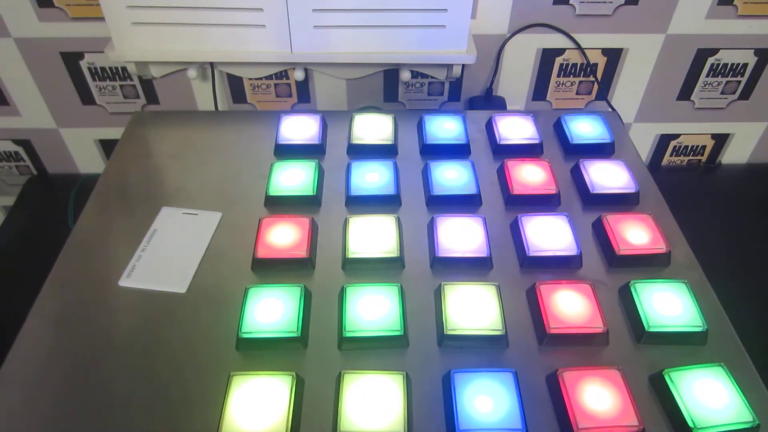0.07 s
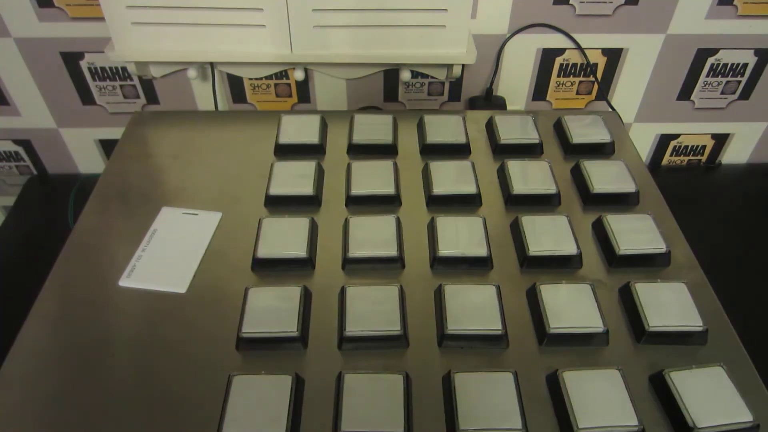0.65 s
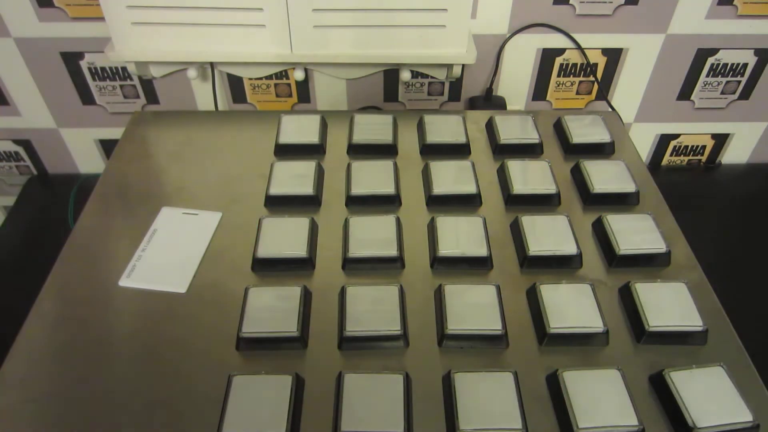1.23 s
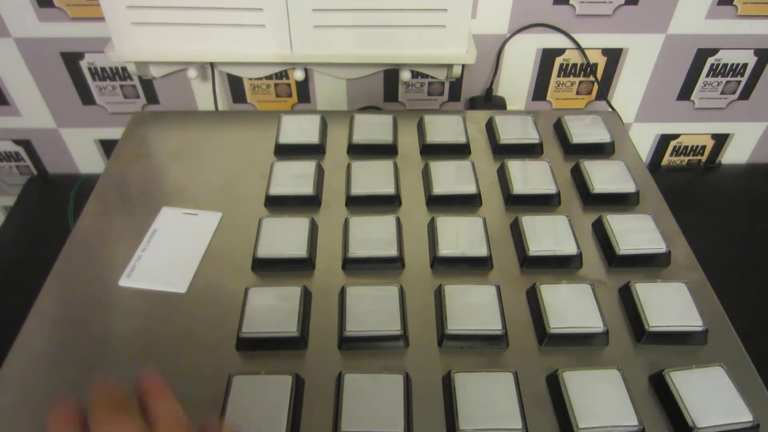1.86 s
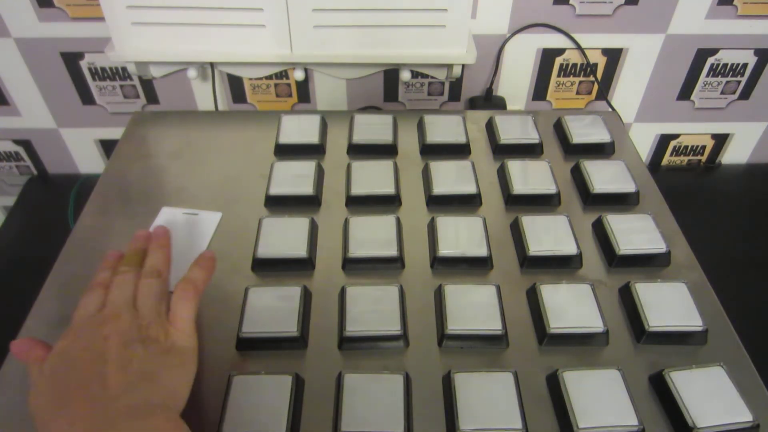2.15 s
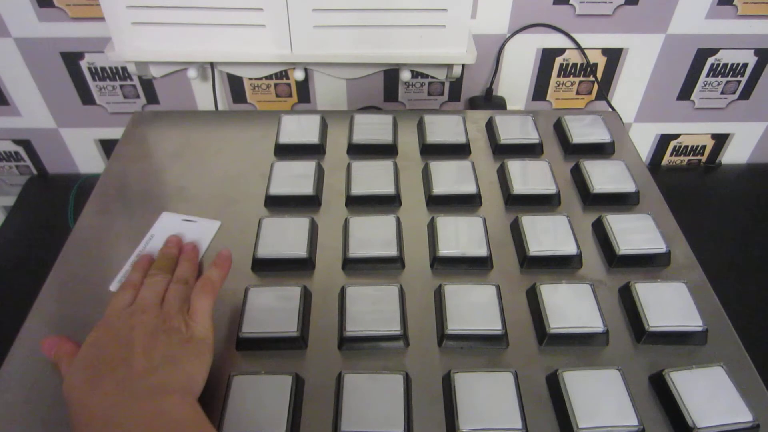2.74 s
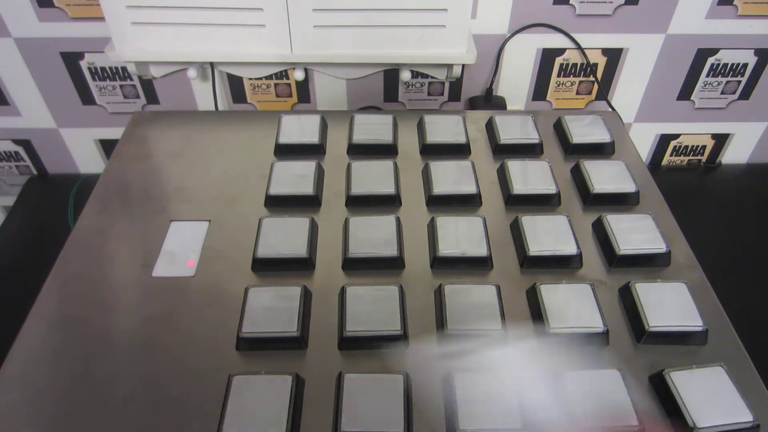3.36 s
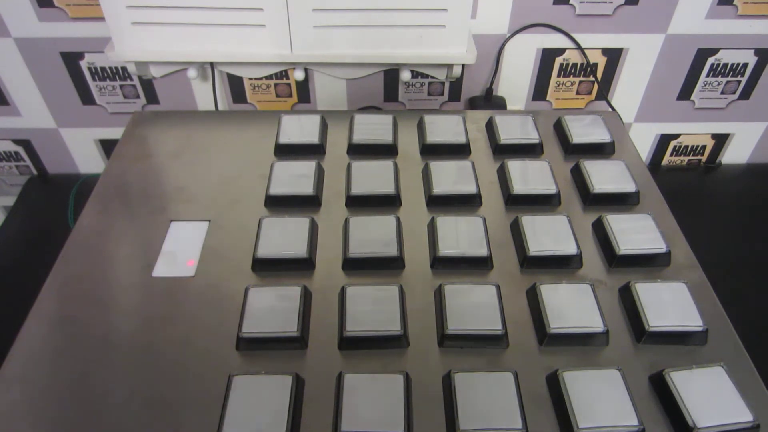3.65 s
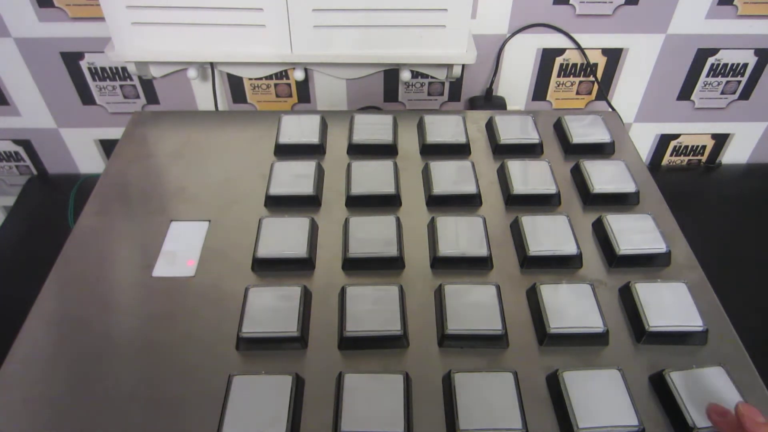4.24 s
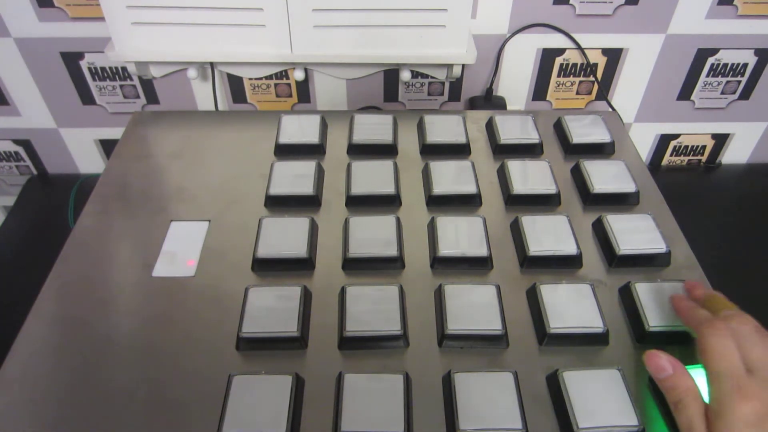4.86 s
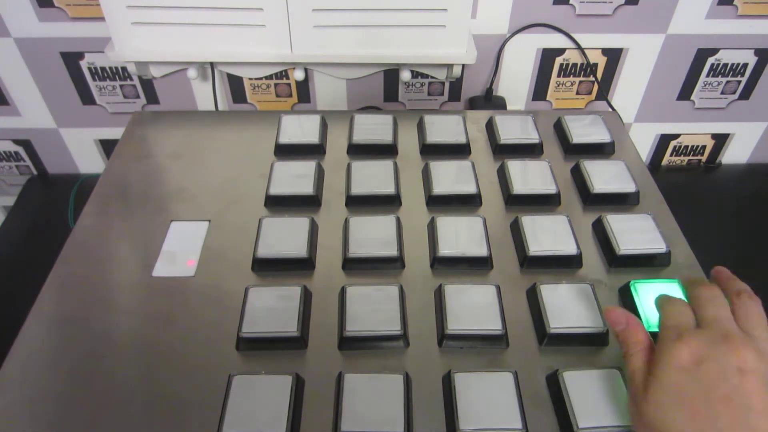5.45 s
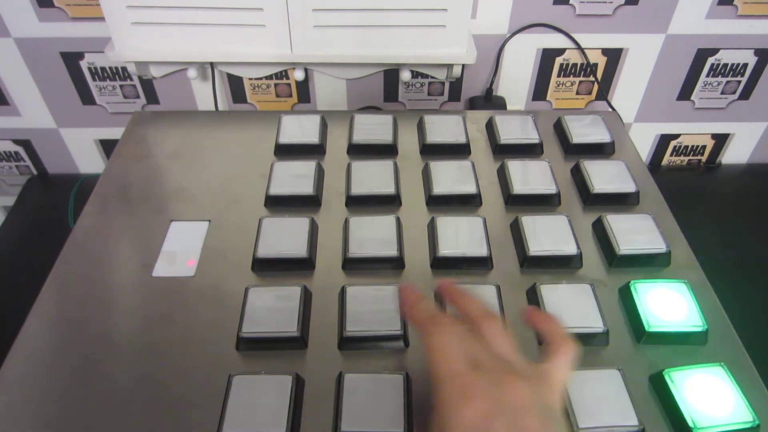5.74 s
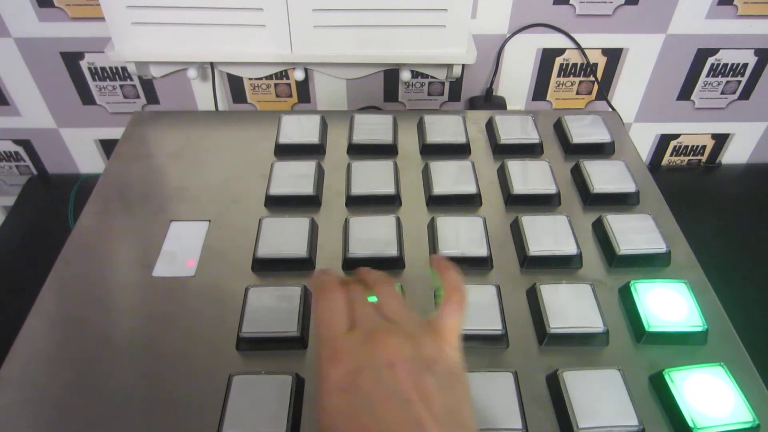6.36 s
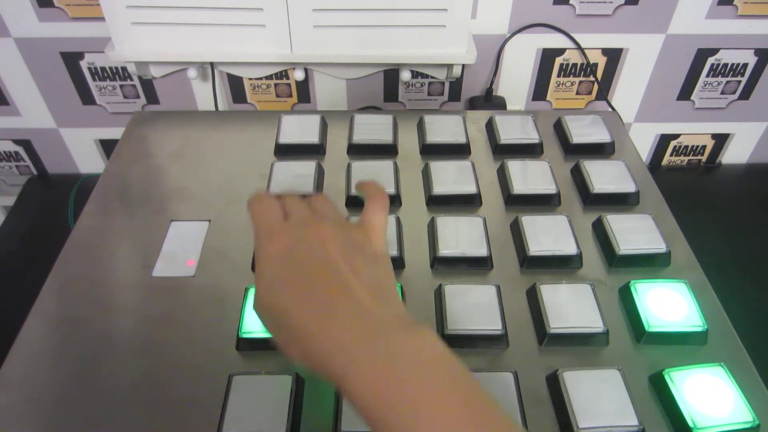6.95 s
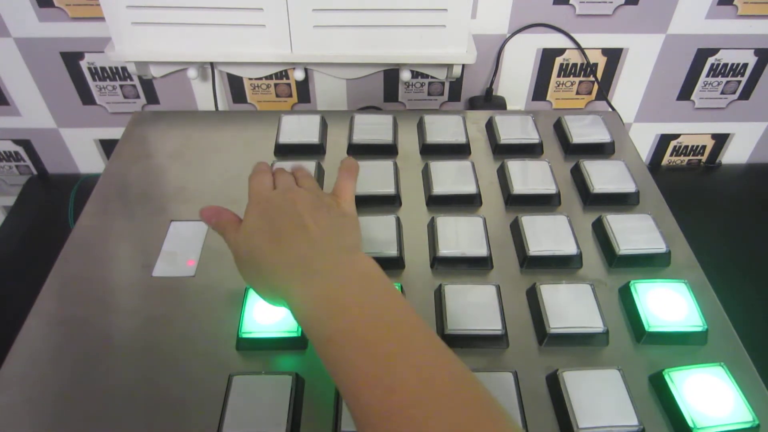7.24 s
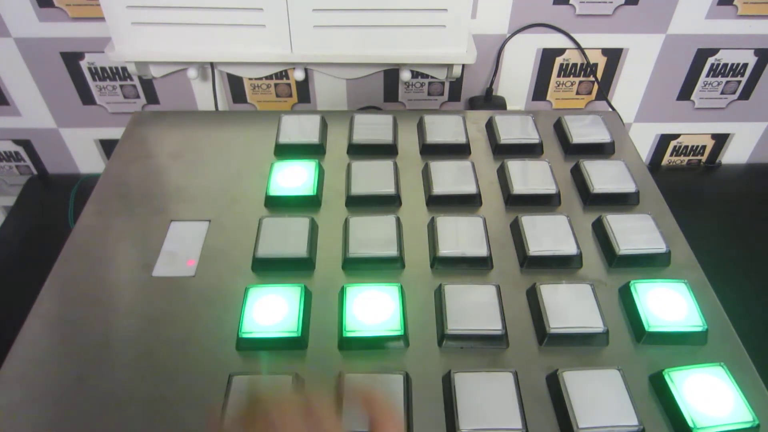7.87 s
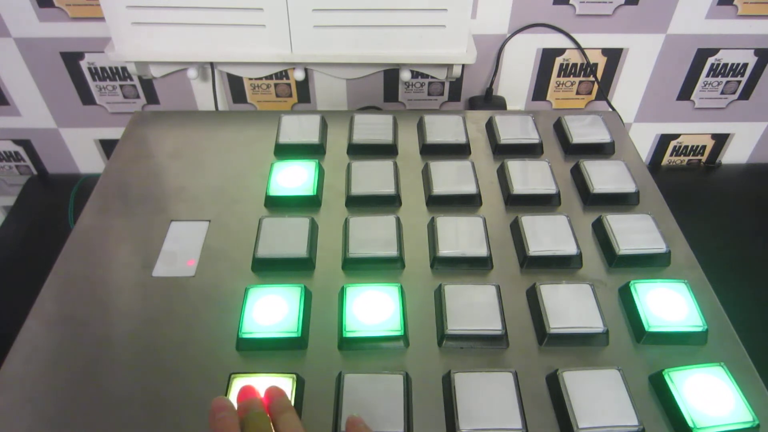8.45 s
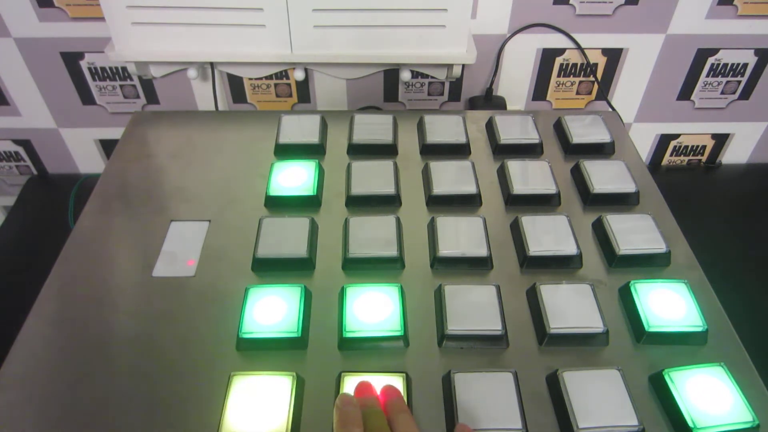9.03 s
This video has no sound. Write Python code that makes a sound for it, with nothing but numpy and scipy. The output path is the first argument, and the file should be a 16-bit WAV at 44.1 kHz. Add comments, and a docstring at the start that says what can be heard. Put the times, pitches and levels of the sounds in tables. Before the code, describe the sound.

Big buttons clack down and snap back one after another in a small room, after a card slides off the console.

```python
"""In a small hard room, over hum and fan noise, a metal console ticks faintly and a hand slides a plastic card
off it: friction, a dense train of tiny slips. After a lone bright click, the hand presses seven large buttons
in turn. Each cap clacks under the finger and chatters as it bottoms out; a spring snaps six of them back before
the sound ends. Each impact excites damped modes of the hollow panel, and the room reverberates."""
import sys
import numpy as np
from scipy import signal
from scipy.fft import rfft, irfft
from scipy.io import wavfile

SR = 44100
rng = np.random.default_rng(int(sys.argv[2]) if len(sys.argv) > 2 else 0)


def master(y):
    """Save y as 16-bit WAV."""
    cut = np.clip(np.atleast_2d(y).T, -1, 1)
    pcm = np.round(cut * 32767)  # scale
    wavfile.write(sys.argv[1], SR, pcm.astype(np.int16))


N = 401310

# Caps bottoming out. Each row: start in seconds, force in dB, brightness in dB, chatter in seconds,
# knock frequency in Hz.
PRESSES = [(4.444, -24.5, 0.5, 0.0091, 1360), (5.166, -25.5, 0, 0.014, 1190),
           (6.087, -21.5, -1, 0.0093, 860), (6.678, -26.5, 1, 0.0098, 1510),
           (7.317, -21, -4.5, 0.0082, 1130), (8.388, -22.5, 1, 0.0058, 950),
           (8.953, -22.5, 1, 0.0083, 1080)]
# Spectral envelope of a press or release. Each row: frequency in Hz, gain in dB.
SNAP_SPECTRUM = [(35, -23), (60, -11.5), (91, -21), (142, -10), (427, -18.5), (469, -10.5), (749, -3.5),
                 (1550, 0.5), (2090, -2.5), (2770, -2.5), (3500, -10.5), (9570, -16.5), (12100, -25),
                 (13900, -26.5), (16000, -39)]
# Prominence of a cap's modes in a press or release. Each row: frequency in Hz, gain in dB, width in Hz.
SNAP_PEAKS = [(158, 1.5, 17), (487, 2.7, 59), (1030, 4.5, 160), (1600, 1, 33), (2760, 1.4, 40),
              (4770, 10, 250), (6900, 3.5, 380), (10000, 4.1, 350), (14200, 2.1, 120)]


def gain_of(db):
    """Amplitude ratio of a level in decibels."""
    return 10 ** (np.asarray(db) / 20)


def unit_rms(x):
    """Normalisation to an rms of 1."""
    return x / np.sqrt(np.mean(x ** 2) + 1e-20)


def curve_at(points, hz):
    """Interpolation on a logarithmic frequency axis."""
    f, value = np.transpose(points)
    return np.interp(np.log(hz + 1), np.log(f + 1), value)


def add(mix, start, sound):
    """Superposition of a stereo sound on the mix, from a start in seconds."""
    part = mix[:, round(start * SR):][:, :sound.shape[1]]
    part += sound[:, :part.shape[1]]


def minimum_phase(gain):
    """Causality: a response of this shape, with peak gain 1, that never precedes its excitation."""
    log_gain = np.log(np.maximum(gain / gain.max(), 1e-5))
    mirrored = np.r_[log_gain, log_gain[-2:0:-1]]
    return np.exp(np.conj(signal.hilbert(mirrored)))[:len(gain)]


def band(hz, low, high):
    """Magnitude response of a fourth-order band-pass."""
    return 1 / np.sqrt((1 + (low / (hz + 1)) ** 8) * (1 + (hz / high) ** 8))


def resonance(hz, centre, width):
    """Response of one damped mode, with gain 1 at its centre."""
    return 1 / (1 + 2j * (hz - centre) / width)


def correlate(noise, coherence):
    """Partial coherence: the right channel shares some of the left one's noise."""
    left, right = noise
    return np.array([left, coherence * left + np.sqrt(1 - coherence ** 2) * right])


def wander(rate_hz):
    """Random modulation: low-passed noise of rms 1."""
    hz = np.fft.rfftfreq(N, 1 / SR)
    return unit_rms(irfft(rfft(rng.standard_normal(N)) * np.exp(-(hz / rate_hz) ** 2), N))


def microphone_paths(hz):
    """Transfer functions from the panel to the two microphone ports, unequal in level and phase."""
    # Each row: frequency in Hz, level of left over right in dB.
    balance = [(60, -6), (120, -2.5), (240, -3), (480, -2.5), (950, -3), (1890, -1), (3770, 1),
               (7520, -3.5), (15000, -11)]
    # Each row: frequency in Hz, phase lead of the left in radians.
    lead = [(0, -0.5), (1460, 0.6), (2330, -0.46), (5000, 1.37), (5600, 0.58), (14400, 2), (16200, -8)]
    left = gain_of(curve_at(balance, hz) / 2) * np.exp(.5j * curve_at(lead, hz))
    return np.array([left, 1 / left])


def fan():
    """Broadband air noise under a few hum tones that waver by phase modulation."""
    # Air noise. Each row: frequency in Hz, relative level in dB.
    air_spectrum = [(15, -45), (25, -13), (48, -4), (102, -2.5), (134, -13), (263, -9), (363, -12),
                    (591, -11.5), (734, -14), (818, -13.5), (1480, -12.5), (3250, -28.5), (7710, -36.5),
                    (11900, -50), (16000, -47)]
    # Each row: frequency in Hz, left-right coherence.
    coherence = [(60, 0.066), (180, 0.04), (550, 0.022), (1650, 0.0087), (5000, 0.011), (15000, .05)]
    # Each row: frequency in Hz, relative level in dB.
    hum_tones = [(102.3, -65.5), (263.8, -70.5), (592.2, -77), (1480, -84)]
    t, hz = np.arange(N) / SR, np.fft.rfftfreq(N, 1 / SR)
    noise = correlate(rfft(rng.standard_normal((2, N))), curve_at(coherence, hz))
    air = unit_rms(irfft(noise * gain_of(curve_at(air_spectrum, hz)), N))
    swell = gain_of(.3 * wander(3))
    hum = sum(gain_of(db) * np.sqrt(2) * np.sin(2 * np.pi * f * t + 1.3 * wander(1.9))
              for f, db in hum_tones)
    return (gain_of(-50.52) * air * swell + gain_of(-3) * hum) * gain_of([[-.6], [.6]])


def crowded_modes(hz):
    """Modal overlap: a cap's upper modes merge into peaks and valleys, new for every spot struck."""
    centres = np.arange(0, SR / 2, 140)
    ripple = np.interp(hz, centres, rng.standard_normal(len(centres)))
    return gain_of(2.3 * unit_rms(ripple) * hz ** 2 / (hz ** 2 + 1000 ** 2))


def impact(start, force_db, bright_db, chatter_s, modes_hz,
           weight_db=0, hollow_db=0, pan_db=0, top_db=0, sway_db=0, *, balance_db):
    """Spectral balance of one impact: thud, clack and click are set relative to the knock."""
    thud_db, clack_db, click_db = balance_db
    levels_db = force_db + np.array([thud_db + weight_db, 0, clack_db + bright_db, click_db + bright_db])
    return start, levels_db, chatter_s, hollow_db, pan_db, top_db, sway_db, modes_hz


def struck_console(impacts, spectrum, peaks, sparkle_db, cavity_db, room_db,
                   t60_scale, crack, thump, thump_hz, thud_rise_scale, coupling=1):
    """Impact excitation: a hard contact and a rattle of small ones ring cap, panel and room."""
    # Modes of the panel and its caps. Each row: frequency in Hz, width in Hz, relative gain in dB.
    panel_modes = [(60.5, 4.8, 11), (142.3, 14.6, 2.5), (194.7, 23, 3), (291, 9.2, 9.5), (370.7, 3.1, 6),
                   (229.3, 34, -8), (470.5, 4.3, 2), (619.6, 7.8, 4), (689, 4.1, 5.5), (861, 9.7, 0.5),
                   (1073, 9.6, 2.5), (1520, 5.9, -13), (1806, 12, -20), (2567, 9.2, 4), (2720, 68, -7.5),
                   (2810, 73, -10), (4890, 25, -0.5), (5560, 69, -11), (6670, 380, -6.5)]
    # Thud, knock, clack and click. Each row: lower and upper band edge in Hz.
    registers = [(70, 400), (400, 2000), (2000, 4500), (4500, 16000)]
    # Each row, one per register: trim in dB, base rise and base T60 in seconds, base room level in dB,
    # room T60 in seconds, left-right coherence of the room.
    decays = [(0.3, 0.019, 0.14, -10, 0.38, 0.73), (0.3, 0.00063, 0.1, -6.5, .32, 0.71),
              (0.3, 0.00065, 0.062, -2.5, 0.27, 0.47), (0.3, 0.0015, 0.023, -4, 0.23, 0.27)]
    size = 24576
    t, hz = np.arange(size) / SR, np.fft.rfftfreq(size, 1 / SR)
    panel = 1 + coupling * sum(gain_of(db) * resonance(hz, f, width) for f, width, db in panel_modes)
    colour, paths = gain_of(curve_at(spectrum, hz)), microphone_paths(hz)
    filters = [minimum_phase(colour * band(hz, *edges)) * panel * paths for edges in registers]
    top_octave = hz ** 6 / (hz ** 6 + 8500. ** 6)
    cavity = np.exp(-(2 * np.log2((hz + 1) / 580)) ** 4)  # the box under the caps
    rocking = 1 / (1 + (hz / 90) ** 6)  # the console sways more under some buttons
    first_contact = np.arange(size) == round(SR * .001)
    flexure = thump * np.sin(2 * np.pi * thump_hz * t)  # the whole panel bends
    peak_db, peak_width = np.array(peaks)[:, :2], np.array(peaks)[:, ::2]
    out = np.zeros((2, N))
    for start, levels_db, chatter_s, hollow_db, pan_db, top_db, sway_db, modes_hz in impacts:
        free_time = np.maximum(t - chatter_s, 0)  # decay begins when the chatter ends
        modes = sum(gain_of(curve_at(peak_db, f)) * resonance(hz, f, curve_at(peak_width, f))
                    for f in modes_hz)
        spot_db = (sparkle_db + top_db) * top_octave + (cavity_db + hollow_db) * cavity
        spot_db += sway_db * rocking
        cap = (1 + modes) * minimum_phase(crowded_modes(hz) * gain_of(spot_db))
        rattle = unit_rms(rng.standard_normal(size) * (rng.random(size) < .15))
        echoes = rng.standard_normal((2, size))
        sides_db = np.array([[.5], [-.5]]) * pan_db
        for k, register_db in enumerate(levels_db):
            trim_db, rise, t60, wet_db, room_t60, coherence = decays[k]
            if k == 0:
                drive = rattle + flexure
                rise *= thud_rise_scale
            else:  # the hard first contact is mostly treble
                drive = rattle + first_contact * crack * k / 2
            direct = drive * (1 - np.exp(-t / rise)) * gain_of(-60 * free_time / (t60 * t60_scale))
            room = correlate(echoes, coherence) * (1 - np.exp(-t / (rise + 0.0011)))
            room *= gain_of(wet_db + room_db - 60 * t / room_t60)
            sound = irfft(rfft(direct + room) * filters[k] * cap)
            sound /= np.sqrt(np.mean(sound[:, t < .03] ** 2))  # the attack sets the level
            add(out, start - .0005, sound * gain_of(trim_db + register_db + sides_db))
    return out


def ticks():
    """Light impacts, weakly coupled to the panel, sound bright and have little body."""
    # Each row: start in seconds, force in dB, brightness in dB, mode frequency in Hz.
    events = [(0.982, -58, -4.5, 3340), (1.008, -61.5, -4, 2330), (1.145, -58.5, -7, 2500),
              (1.197, -57, -2.5, 2790), (1.375, -68, 22, 3770), (3.777, -36.5, 2.5, 4170)]
    # Spectral envelope. Each row: frequency in Hz, gain in dB.
    spectrum = [(100, 0), (900, -6.5), (2000, -6.5), (3000, -3), (5500, -13), (9000, -22.5), (12000, -33),
                (16000, -43)]
    # Modal prominence. Each row: frequency in Hz, gain in dB, width in Hz.
    peaks = [(1200, -23, 200), (3800, 10, 1600)]
    impacts = [impact(start, force_db, bright_db, 0.003, [mode_hz], balance_db=(-13, 2.4, -0.5))
               for start, force_db, bright_db, mode_hz in events]
    return struck_console(impacts, spectrum, peaks, sparkle_db=3, cavity_db=0, room_db=-0.5,
                          t60_scale=0.83, crack=9.8, thump=.02, thump_hz=159, thud_rise_scale=0.75,
                          coupling=.2)


def stroke(t, length, rise_share, easing_db_per_s, hold_s=0.13, t60=0.25):
    """Friction envelope: it grows with speed, eases as the hand lightens and decays once it stops."""
    rise = np.clip(t / (rise_share * length), 0, 1)
    easing_db = easing_db_per_s * np.maximum(t - hold_s, 0)
    decay_db = 60 * np.maximum(t - length, 0) / t60
    return rise * gain_of(-easing_db - decay_db)


def card_friction():
    """Sliding friction: tiny slips come in clumps as the card is brushed, dragged and lifted off."""
    # Each row: start in seconds, length in seconds, level in dB, brightness in dB.
    strokes = [(2.316, 0.057, -45, -6), (2.756, 0.48, -39, 4.5), (3.32, .09, -72, 10)]
    # Rumble, rub and hiss. Each row: relative level in dB, rising share of a stroke, easing in dB/s.
    envelopes = [(-4.5, .1, 41), (-0.5, 0.1, 70), (-3.5, 0.31, 32)]
    # Plastic on metal. Each row: frequency in Hz, gain in dB.
    spectrum = [(29, -27), (50, 11), (81, -12), (138, -3), (291, -12.5), (329, -16), (461, -14), (746, -10),
                (1180, -7), (1270, -6.5), (2490, -8.5), (3330, -17), (6090, -14), (12000, -13.5),
                (16000, -15)]
    # The same three layers. Each row: band edges in Hz, graininess in dB, left-right coherence.
    layers = [(70, 890, 0.86, 0.48), (680, 5300, 0.9, 0.61), (3670, 8700, 1.0, 0.56)]
    t, hz = np.arange(N) / SR, np.fft.rfftfreq(N, 1 / SR)
    surface = gain_of(curve_at(spectrum, hz)) * microphone_paths(hz)
    out = np.zeros((2, N))
    for k, (low, high, grain_db, coherence) in enumerate(layers):
        layer_db, rise_share, easing = envelopes[k]
        slips = correlate(rng.standard_normal((2, N)), coherence) * gain_of(grain_db * wander(400))
        rub = unit_rms(irfft(rfft(slips) * surface * band(hz, low, high), N))
        for start, length, level_db, bright_db in strokes:
            tilt_db = (k - 1) * bright_db  # a bright stroke trades rumble for hiss
            envelope = stroke(t - start, length, rise_share, easing)
            out += rub * envelope * gain_of(level_db + layer_db + tilt_db)
    return out


def card_taps():
    """Soft impacts of fingers and card bend the panel, which radiates a low thump."""
    # Each row: start in seconds, force, weight and brightness in dB, mode frequency in Hz.
    events = [(2.466, -45, -1, -1, 680), (2.748, -37.5, 9, 2, 1360), (2.952, -37.5, -11.5, -5, 650),
              (3.172, -63, 18.5, 0, 1340)]
    # Spectral envelope. Each row: frequency in Hz, gain in dB.
    spectrum = [(60, -3), (130, 5.5), (300, -2), (500, 0), (900, -7), (1600, -10), (7400, -19),
                (10500, -26), (16000, -45)]
    # Modal prominence. Each row: frequency in Hz, gain in dB, width in Hz.
    peaks = [(700, 5, 26), (3000, -1, 270)]
    impacts = [impact(start, force_db, bright_db, 0.0045, [mode_hz, 2370], weight_db,
                      balance_db=(0, -5.5, -10))
               for start, force_db, weight_db, bright_db, mode_hz in events]
    return gain_of(2.5) * struck_console(
        impacts, spectrum, peaks, sparkle_db=-3, cavity_db=-2.5, room_db=8.5,
        t60_scale=0.66, crack=3.8, thump=0.53, thump_hz=158.2, thud_rise_scale=0.13)


def button_at(time):
    """Position sets timbre: the seating and natural frequencies of the button pressed nearest in time."""
    # Each row, in order of pressing: weight, hollowness, left-right balance, sparkle and sway in dB,
    # then the body, box, clack, click and top modes in Hz.
    buttons = [(-1.5, -5.5, -.6, 0.5, -7, 280, 380, 2700, 6220, 13900),
               (-4, -2, -1, 0, -6, 197, 600, 2580, 4850, 9700),
               (-4, -4.5, 0.3, 0, 3, 180, 580, 2420, 5110, 9560),
               (4.5, 1, 0.3, -4, -1.5, 139, 800, 2720, 7200, 10200),
               (0.5, 0.5, 0.5, -1, -4.5, 171, 600, 2450, 6360, 8200),
               (1, -3, 0.1, -4.5, 5, 162, 400, 2500, 6420, 7940),
               (-2, -2, -.5, -4, 4, 130, 520, 2400, 6800, 10000)]
    button = buttons[np.argmin([abs(press[0] - time) for press in PRESSES])]
    return button[:5], button[5:]


def click_and_clacks():
    """A lone bright click on the console, then light finger clacks on caps: firmer impact, more treble."""
    # Each row: start in seconds, force in dB, base brightness in dB, knock frequency in Hz.
    events = [(3.682, -32, 9, 1144), (4.369, -41, -0.5, 1200), (4.401, -26, 1.5, 1200),
              (4.615, -44, 5, 1140), (4.92, -30, -0.5, 1200), (5.124, -30, -2, 1210), (6.03, -45, -5, 880),
              (6.046, -28.5, -2, 1150), (6.25, -44.5, -1, 885), (6.527, -40, -4, 723),
              (6.631, -32, -1, 1080), (6.842, -37, 6.5, 840), (7.252, -39, -2, 940), (7.272, -31, -2, 630),
              (7.514, -41, -1, 605), (8.306, -41, 10, 2020), (8.314, -30.5, 0, 980), (8.35, -31, 3.5, 1510),
              (8.906, -34.5, 1, 1100)]
    # Spectral envelope. Each row: frequency in Hz, gain in dB.
    spectrum = [(35, -73), (60, -8), (189, -5), (682, -10.5), (1140, -3), (1580, -4.5), (1860, -5.5),
                (2250, -8.5), (3500, -17), (10000, -34.5), (12100, -48), (14200, -51), (16000, -46)]
    # Modal prominence. Each row: frequency in Hz, gain in dB, width in Hz.
    peaks = [(700, 11.5, 60), (1200, 6.5, 140), (2700, -17.5, 210)]
    firm_db, treble_per_force, chatter_s = -28, 0.39, 0.0019
    impacts = []
    for start, force_db, bright_db, knock_hz in events:
        seat, _ = button_at(start)
        treble_db = bright_db + treble_per_force * (force_db - firm_db)
        impacts.append(impact(start, force_db, treble_db, chatter_s, [knock_hz, 2410], *seat,
                              balance_db=(-9.5, -8.5, -17.5)))
    return gain_of(0.17) * struck_console(
        impacts, spectrum, peaks, sparkle_db=-1.5, cavity_db=3, room_db=3,
        t60_scale=0.83, crack=4.6, thump=0.079, thump_hz=159, thud_rise_scale=0.44)


def presses():
    """Free vibration: a cap bottoms out, chatters briefly and rings in all the modes of its button."""
    impacts = []
    for start, force_db, bright_db, chatter_s, knock_hz in PRESSES:
        seat, modes_hz = button_at(start)
        impacts.append(impact(start, force_db, bright_db, chatter_s, [knock_hz, *modes_hz], *seat,
                              balance_db=(-8.5, -2.7, -7.5)))
    return struck_console(impacts, SNAP_SPECTRUM, SNAP_PEAKS, sparkle_db=-12.5, cavity_db=-2,
                          room_db=3.5, t60_scale=1.2, crack=7.2, thump=.07, thump_hz=149.1,
                          thud_rise_scale=0.6)


def releases():
    """The spring's restoring force throws the cap against its frame, with more sparkle than a press."""
    # Each row: start in seconds, force and brightness in dB, chatter in seconds, knock frequency in Hz.
    events = [(4.641, -26, .5, 0.0017, 1600), (5.397, -24.5, -.5, 0.0094, 1205),
              (6.288, -24, 0, .007, 1570), (6.863, -26.5, -0.5, 0.0035, 1600),
              (7.534, -24.5, -5, 0.0035, 1575), (8.562, -25, 1.5, 0.0018, 1600)]
    # Modes that every release excites, in Hz.
    common_hz = [478, 5950, 14500]
    impacts = []
    for start, force_db, bright_db, chatter_s, knock_hz in events:
        seat, (body_hz, _, clack_hz, _, top_hz) = button_at(start)
        modes_hz = [knock_hz, body_hz, clack_hz, top_hz, *common_hz]
        impacts.append(impact(start, force_db, bright_db, chatter_s, modes_hz, *seat,
                              balance_db=(-10, -5, -10)))
    return gain_of(1.6) * struck_console(
        impacts, SNAP_SPECTRUM, SNAP_PEAKS, sparkle_db=-0.5, cavity_db=-1.6, room_db=3.5,
        t60_scale=1.25, crack=4.7, thump=0.048, thump_hz=172.3, thud_rise_scale=0.66)


def scene():
    """Superposition: the sound pressures of buttons, console, card and fan add."""
    return click_and_clacks() + presses() + releases() + ticks() + card_taps() + card_friction() + fan()


def record(dry):
    """The microphone's frequency response: a notch in the high treble, then a low-pass band limit."""
    hz = np.fft.rfftfreq(N, 1 / SR)
    notch_hz, notch_width_hz, notch_db, cutoff_hz = 12150, 750, -14, 16100
    notch = gain_of(notch_db * np.exp(-((hz - notch_hz) / notch_width_hz) ** 2))
    coloured = irfft(rfft(dry) * notch, N)
    low_pass = signal.firwin(511, cutoff_hz, window=("kaiser", 9), fs=SR)
    return signal.oaconvolve(coloured, low_pass[None], "same")


dry = scene()
out = record(dry)
master(out)
```